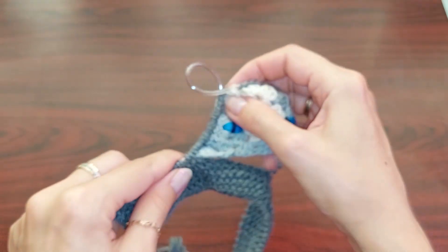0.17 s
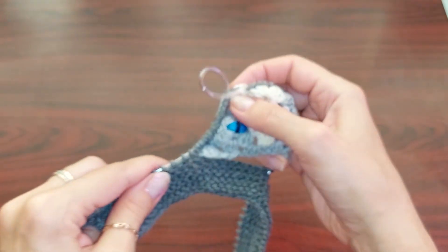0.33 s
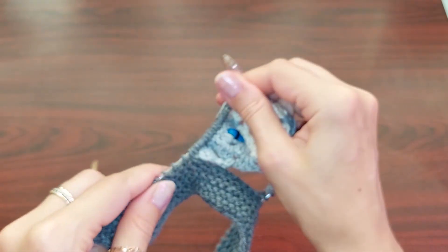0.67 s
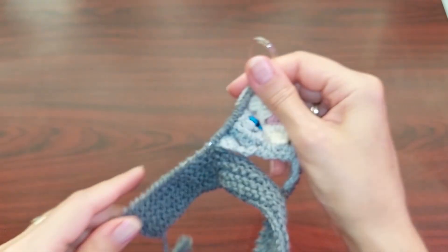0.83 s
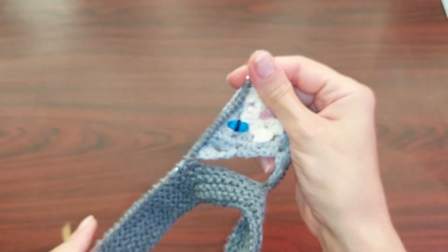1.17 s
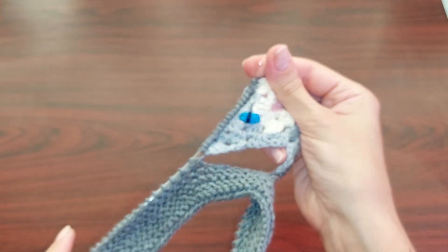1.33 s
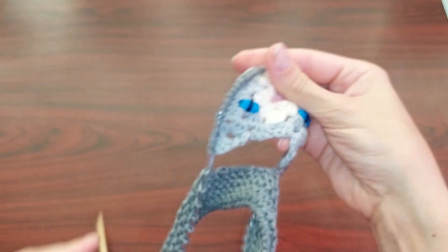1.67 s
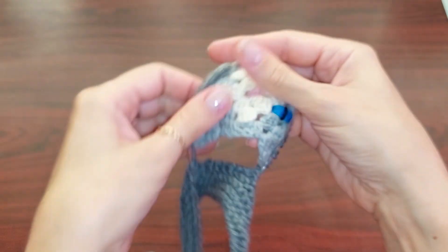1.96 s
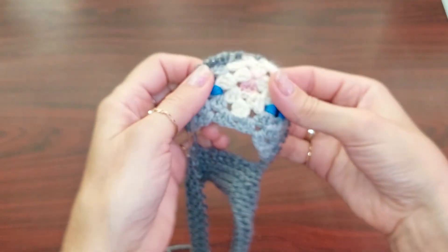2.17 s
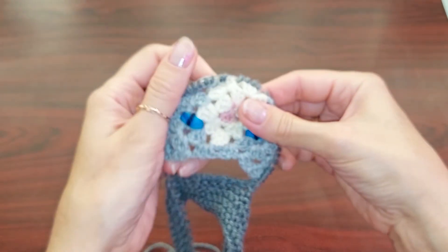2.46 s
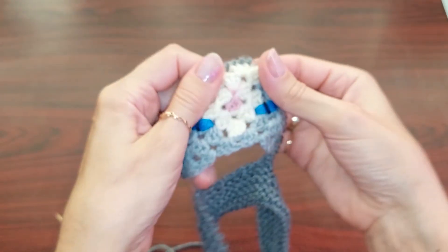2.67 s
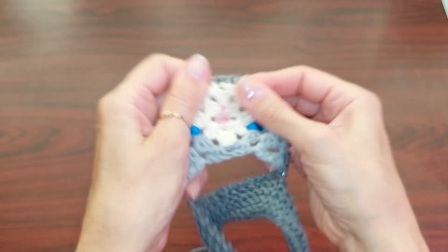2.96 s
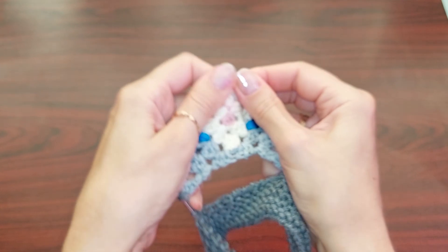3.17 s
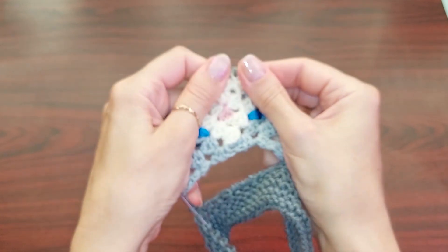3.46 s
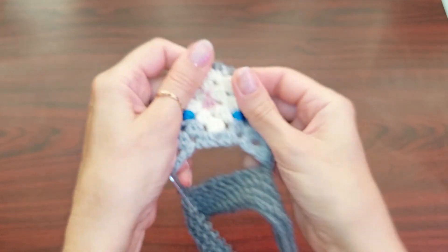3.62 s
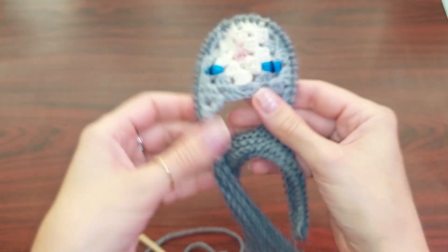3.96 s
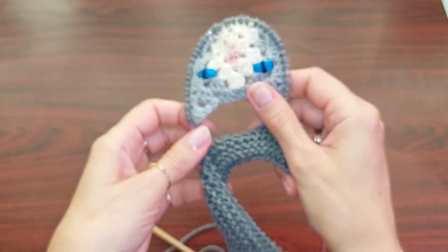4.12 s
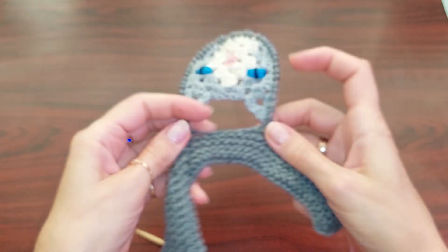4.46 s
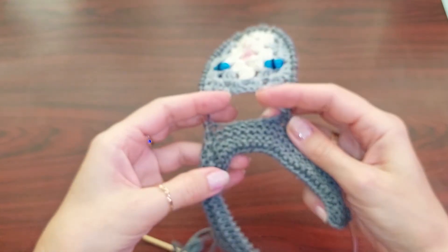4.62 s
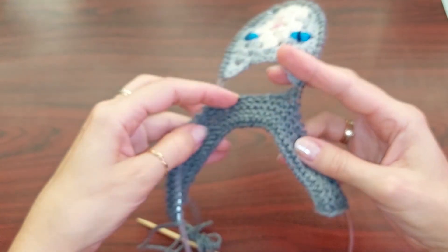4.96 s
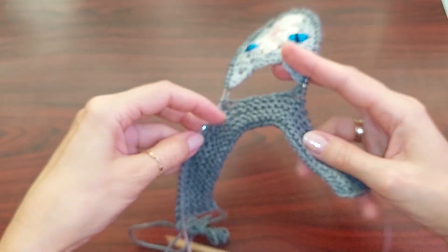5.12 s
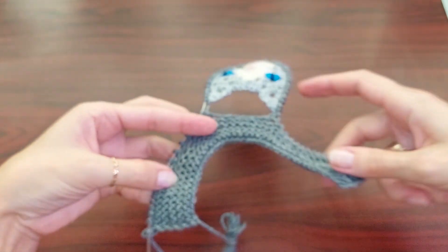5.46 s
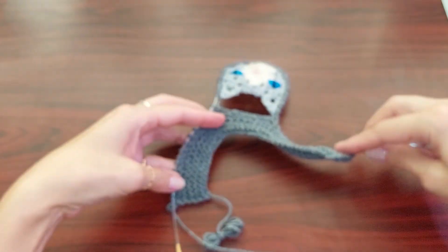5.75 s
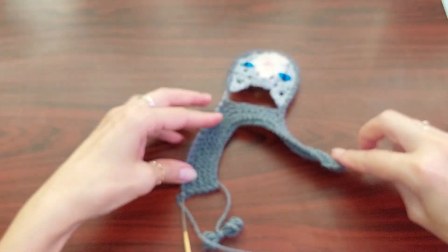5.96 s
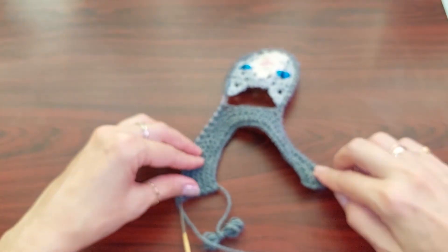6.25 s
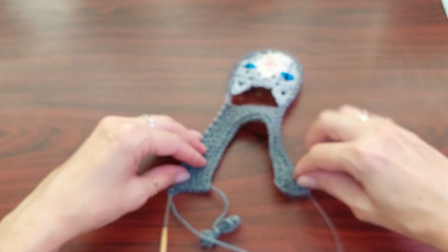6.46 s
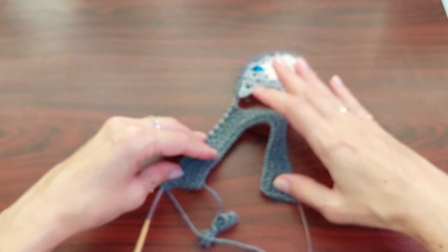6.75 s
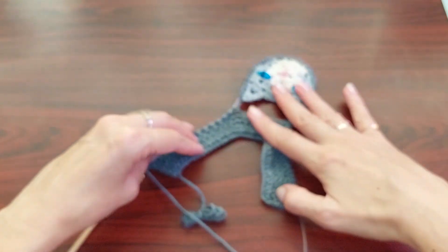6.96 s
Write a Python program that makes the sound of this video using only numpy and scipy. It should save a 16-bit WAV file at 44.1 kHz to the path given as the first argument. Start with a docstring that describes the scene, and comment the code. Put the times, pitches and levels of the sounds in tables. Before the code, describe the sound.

Knitting needles click and tick irregularly as hands shift soft rustling wool, with one brief cable creak, in a small room.

```python
"""In a small, live room, hands shift a piece of knitting on a circular needle over a wooden table.
Needles and fingers click and tick on impact. Stick-slip friction makes the cable creak through tight
stitches, stretched yarn stutter and dragging fingers sing. Wool rustles as its fibres catch and let go,
and one bump of a hand excites the table's low modes. Ventilation murmurs underneath."""
import sys
import numpy as np
from scipy import signal
from scipy.fft import rfft, irfft
from scipy.io import wavfile

SR = 44100
rng = np.random.default_rng(int(sys.argv[2]) if len(sys.argv) > 2 else 0)


def pcm_store(signal):
    """Save signal as 16-bit PCM."""
    levels = np.round(np.clip(np.atleast_2d(signal), -1, 1) * 32767)
    wavfile.write(sys.argv[1], SR, levels.astype(np.int16).T)


N = 312565
TAPS = 4096
BINS = np.fft.rfftfreq(TAPS, 1 / SR)


# The spectrum common to all clicks. Each row: frequency in Hz, gain in dB.
CLICK_SPECTRUM = [(40, -32), (130, -4), (210, -4), (310, 1.5), (550, -0.5), (750, -4), (1200, -4),
                  (2000, 2.5), (3100, 6), (5000, 6.5), (10000, 6.5), (12000, 9.5), (14500, 5),
                  (16000, -3.5)]
# A hollow colour, as from between cupped hands. Each row: frequency in Hz, gain in dB.
CUPPED_HANDS = [(620, 1), (860, -5), (1350, 5), (1700, 5), (2300, -6), (3200, 1), (4100, -4), (5200, 0.5),
                (6600, -3), (8200, 2), (9500, -1)]
# The needle's modes. Each row: frequency in Hz, level in dB, 60 dB decay time in seconds.
NEEDLE_MODES = [(2035, 3.5, 0.013), (4680, 8.5, 0.0079), (5100, -9.5, 0.0042)]
# A low resonance that moves with the grip. Each row: time in seconds, frequency in Hz.
GRIP_RESONANCE = [(0.21, 257), (0.37, 280), (0.43, 540), (0.6, 253), (0.82, 288), (2.9, 574), (3.2, 427),
                  (3.8, 584), (4.3, 518), (4.6, 335), (5.6, 315), (7, 476)]
# Where the hands work. Each row: time in seconds, left over right in dB.
HAND_PAN = [(0.5, 5.5), (2.5, 1.5), (3.7, 2.5), (5.5, -2), (7.0, 1)]
# Impacts of needles and fingers. Each row: start in seconds, level in dB, bass and treble against the
# mids in dB, ring frequency in Hz, ring height in dB, direct sound gain in dB, needle knock in dB.
IMPACTS = [(0.029, -24.5, -5, -14, 2940, 8.5, -7, -11), (0.2143, -14, 3.5, -3.5, 8850, 3.5, -8.5, -20),
           (0.369, -14.5, -6.5, 1, 6730, 1.5, -5, -15), (0.4323, -12, -2.5, -6.5, 8160, 3, -5.5, -9.5),
           (0.604, -1.5, -1, 5, 3600, 3, -6, -10.5), (0.8164, -23.5, 7, -3.5, 1330, 13.5, -6.5, -19),
           (1.0256, -22.5, 6, -0.5, 1520, 12, -7.5, -21), (1.548, -23.5, -8.5, -6, 4230, -4, -18, -20),
           (2.129, -29, -5, -8, 8200, 5, -0.5, -23), (2.1903, -23.5, -11, -3, 8100, 2, -6, -27),
           (2.3022, -13, -3.5, 4, 9400, 4, -5, -15), (2.481, -21, -4, -9.5, 7700, 2.5, -5, -22),
           (2.619, -27, -6.5, -13.5, 3340, 0, -15, -20), (2.841, -8.5, -15, -7, 10300, 6.5, -4.5, -10.5),
           (2.923, -15.5, -10, -10.5, 3030, 5, -5, -11), (3.195, -6, 5.5, 9.5, 6350, 10.5, -6.5, -7),
           (3.224, -8, -11.5, -11.5, 6500, 11.5, -9, -5), (3.4022, -20, -41, -5, 4600, 9, -7.5, -17),
           (3.5344, -15, -50, -0.5, 5200, 7.5, -4.5, -5.5), (3.7435, -28.5, 0, -6.5, 8400, 0, -14, -23),
           (3.782, -16.5, 2.5, -6, 1650, 1, -5.5, -10), (4.0228, -17.5, -5.5, -7, 1300, 1, -9, -15),
           (4.165, -25.5, 2, -8.5, 8450, 2.5, -5, -26.5), (4.2791, -28.5, 6, -5, 5400, -3, -4.5, -23),
           (4.3832, -21, -11.5, 3, 6500, 4.5, -6, -25), (4.588, -0.5, -12, -4.5, 4400, 3, -6, -3.5),
           (4.6747, -11.5, -3, -8.5, 1280, 4, -6.5, -21), (4.7449, -17, -14, -6, 1310, 6.5, -12, -25),
           (5.0469, -2.5, -11, -2.5, 8500, 5.5, -7, -8), (5.581, 4.5, -10.5, -2.5, 2260, 7.5, -2.5, 1),
           (6.1846, -16.5, -16.5, -27.5, 1020, 8, -15.5, -10), (6.725, -21, -32, -6.5, 4910, 5.5, -7, -10),
           (7.0257, -9, -7, -2, 8350, 3.5, -4.5, -6)]


def clicks(chatter_s=0.0022, chatter_doubling_db=31, grip_db=7, room_db=-0.54):
    """Impacts ring resonances; louder clicks have shorter chatter."""
    out = np.zeros((2, N))
    needle = abs(rfft(unit(ring(NEEDLE_MODES))[:TAPS]))
    for start, db, bass, treble, ring_hz, ring_db, direct_db, knock_db in IMPACTS:
        tilt = read([(550, bass), (1100, 0.005), (2100, 0.005), (4200, 0.74 * treble - 1),
                     (6500, treble), (11000, 1.43 * treble - 0.5)], BINS)
        tilt += read([(12500, 0), (15500, min(db, 0) / 2)], BINS)  # the top treble falls away on quieter clicks
        grip_hz = np.interp(start, *np.transpose(GRIP_RESONANCE))
        peaks = ring_db * hump(ring_hz, width=0.12) + grip_db * hump(grip_hz, width=0.17)
        hollow = np.clip((bass + 13) / 10, 0, 1.2) * read(CUPPED_HANDS, BINS)  # deep taps sound hollow
        body = amp(read(CLICK_SPECTRUM, BINS) + peaks + hollow + ripple(db=3.5, per_octave=11))
        colour = minimum_phase(tilt + 20 * np.log10(np.hypot(body, amp(knock_db) * needle)))
        crack = contact(chatter_s * 2 ** (-db / chatter_doubling_db))
        pan_db = np.interp(start, *np.transpose(HAND_PAN))
        add(out, start, amp(db + direct_db) * pan(pan_db) * unit(convolve(crack, colour)))
        add(out, start, amp(db + room_db) * unit(convolve(room_tail(), colour)))
    return out


# Thin, dry ticks. Each row: start in seconds, energy in dB, centre frequency in Hz.
LIGHT_CONTACTS = [(1.1414, -24.5, 5060), (1.767, -17, 10000), (1.951, -35.5, 10400), (2.8227, -16, 5400),
                  (5.8187, -33.5, 6400), (6.566, -38.5, 6940)]


def ticks(chatter_s=0.0012, slope_db_per_octave=13, pan_db=4, room_db=-8):
    """A brief contact has a broad spectrum, here with a single hump in the treble."""
    out = np.zeros((2, N))
    for start, db, hz in LIGHT_CONTACTS:
        octaves_away = abs(np.log2((BINS + 1) / hz))
        colour = minimum_phase(-slope_db_per_octave * np.minimum(octaves_away, 3))
        add(out, start, amp(db) * pan(pan_db) * unit(convolve(contact(chatter_s), colour)))
        add(out, start, amp(db + room_db) * unit(convolve(room_tail(), colour)))
    return out


# What a slip rings. Each row: frequency in Hz, gain in dB under a light grip, then under a tight one.
CABLE_SPECTRA = [(606, -9.5, -13), (1150, -8, -11), (1400, -31, -11), (1745, -6, -4), (2050, -3, 4.5),
                 (2660, -2.5, 1.5), (3000, -12, -2.5), (4100, -6.5, -8), (4400, 3.5, -5),
                 (4670, -10.5, -7.5), (6120, 1, -12), (6870, -9.5, -19), (8000, -4, -14.5),
                 (9900, -9.5, -23), (14000, -13, -21.5), (16000, -29, -30)]
# The cable runs, catches, then breaks free. Each row: time in seconds, slips per second,
# slip level in dB, low cutoff in Hz, grip from 0 to 1.
CABLE_PULL = [(1.181, 240, -22.5, 1700, 0.24), (1.22, 360, -20.5, 1560, 0.15), (1.303, 340, -18, 1480, 0.2),
              (1.316, 150, -16, 890, 0.52), (1.397, 140, -11, 690, 0.65), (1.423, 360, -13, 540, 0.88),
              (1.435, 320, -12.5, 537, 0.3)]


def cable_creak(delay_s=0.0006, delay_at_hz=1150, grit_hz=6000, direct_db=-0.7, room_db=-6.5):
    """Stick-slip in the stitches launches bending waves; dispersion turns each slip into a chirp."""
    times, *controls = np.transpose(CABLE_PULL)
    t = np.arange(times[0], times[-1], 1 / SR)
    rate, db, cutoff_hz, grip = (np.interp(t, times, control) for control in controls)
    train = slips(rate, jitter=0.14, spread_db=1) * amp(db)
    light, tight = (read(np.array(CABLE_SPECTRA)[:, [0, k]], BINS) for k in (1, 2))
    grit_share = 0.45 / (1 + (grit_hz / (BINS + 1)) ** 4)
    chirp = np.exp(-4j * np.pi * delay_s * np.sqrt(BINS * delay_at_hz))  # low waves travel slowest
    dry = np.zeros((2, N))
    for i in np.flatnonzero(train):
        low_cut = np.maximum(-10 * np.log10(1 + (cutoff_hz[i] / (BINS + 1)) ** 8), -50)
        colour_db = light + grip[i] * (tight - light) + low_cut + ripple(db=1.6, per_octave=5)
        colour = rfft(minimum_phase(colour_db), TAPS)
        grit = rfft(contact(chatter_s=0.0011), TAPS)
        push = np.sqrt(1 - grit_share) * chirp + np.sqrt(grit_share) * grit
        add(dry, t[i], train[i] * unit(irfft(colour * push)[:, :TAPS // 2]))
    reverb = convolve(dry, room_tail(early_db=15, early_s=0.017))[:, :N]
    return amp(direct_db) * pan(db=2) * dry + amp(room_db) * reverb


# The resonances of the rasp. Each row: frequency in Hz, bandwidth in Hz, weight in dB.
YARN_MODES = [(1400, 210, -19), (1600, 240, -1), (2680, 480, -12), (5100, 1900, -37), (7800, 1800, -41)]
# Each row: start and length in seconds, level in dB, share of hollow ring in dB, slips per second.
YARN_PULLS = [(0.033, 0.14, -64.5, -20, 83), (2.66, 0.076, -65, -4.5, 360), (2.73, 0.085, -57.5, -4.5, 350),
              (3.817, 0.14, -56.5, -2, 320)]


def yarn_stutter(glide_hz=(600, 525), width_hz=115, scrape_s=0.002, fade_s=0.005, room_db=-5):
    """Stretched yarn yields by stick-slip, driving a rasp and a hollow resonance that sinks with it."""
    out = np.zeros((2, N))
    modes = [(hz, db + 10 * np.log10(width), decay_time(width)) for hz, width, db in YARN_MODES]
    rasp_response = np.gradient(ring(modes))
    for start, length, db, hollow_db, rate in YARN_PULLS:
        t = np.arange(0, length, 1 / SR)
        jerks = slips(np.full(len(t), rate), jitter=0.3, spread_db=0.5)
        scrape = convolve(jerks, np.exp(-t / scrape_s))[:, :len(t)] * rng.standard_normal(len(t))
        hz = np.linspace(*glide_hz, len(t))
        hollow = unit(resonate(resonate(scrape, hz, width_hz), hz, width_hz))
        rasp = unit(convolve(scrape, rasp_response)[:, :len(t)])
        share = min(amp(hollow_db), 0.95)
        envelope = swell(t, length, peak=0.6, ends_db=-5.5) * np.minimum((length - t) / fade_s, 1)
        dry = amp(db) * np.sqrt(len(t)) * envelope * (share * hollow + np.sqrt(1 - share ** 2) * rasp)
        add(out, start, dry)
        add(out, start, amp(room_db) * convolve(dry, room_tail()))
    return out


# Each row: start and length in seconds, level in dB, resonance frequency and bandwidth in Hz.
FINGER_DRAGS = [(0.0, 0.13, -64, 1970, 720), (5.24, 0.14, -67, 1440, 500), (5.738, 0.033, -53, 3470, 700),
                (5.925, 0.053, -66.5, 1244, 505), (6.347, 0.022, -51, 5070, 810),
                (6.36, 0.09, -60.5, 1950, 400), (6.915, 0.025, -52.5, 1470, 700)]


def finger_rubs(slips_per_s=400):
    """Uneven stick-slip of skin on needle or table drives one heavily damped resonance."""
    out = np.zeros((2, N))
    for start, length, db, hz, width in FINGER_DRAGS:
        t = np.arange(0, length, 1 / SR)
        friction = slips(np.full(len(t), slips_per_s), jitter=0.5, spread_db=3)
        friction *= swell(t, length, peak=0.5, ends_db=-3)
        body = ring([(hz, 0, decay_time(width))])
        voice = amp(db) * np.sqrt(len(t)) * unit(convolve(convolve(friction, body), np.gradient(body)))
        add(out, start, convolve(voice, room_tail(early_db=20, early_s=0.012)))
    return out


# The spectrum of rubbing fibres. Each row: frequency in Hz, gain in dB.
WOOL_SPECTRUM = [(180, -11.5), (330, 1), (480, -4.5), (750, -21), (1000, 4.5), (1800, 5), (2600, 3.5),
                 (4000, -10), (5200, -6.5), (12500, -13.5), (15500, -34.5)]
# Wool slides on skin and wood. Each row: start and length in seconds, place of the peak from 0 to 1,
# level in dB, low and high bands against the mids in dB.
WOOL_STROKES = [(0.287, 0.041, 0.1, -62, -28, 6), (1.036, 0.22, 0, -60.5, -8, 0),
                (1.714, 0.092, 0.9, -60.5, -10, 2), (1.905, 0.23, 0.8, -67.5, -10, 4),
                (2.29, 0.13, 0.4, -58, -40, 8), (3.028, 0.1, 1, -82, -26, 15),
                (3.657, 0.087, 0.3, -81.5, -23, 10), (3.851, 0.17, 0, -61.5, -7, 2.5),
                (4.425, 0.083, 0.66, -73.5, -22, 11), (5.151, 0.51, 0, -61.5, -21, 0),
                (5.712, 0.076, 0.52, -55.5, -8, 2), (5.788, 0.19, 0.88, -67.5, 1, -3),
                (6.34, 0.063, 0.17, -71, -28, 19), (6.385, 0.059, 0.87, -67.5, -24, 13),
                (6.79, 0.17, 0.38, -51.5, -16, 1), (6.873, 0.37, 0.36, -55.5, 0.5, -7)]


def wool_rustle(catches_per_s=1500, stitches_per_s=70, fade_s=0.0084, direct_db=-4, room_db=-2):
    """Friction noise: many fibres catch and let go at random, in clumps as the stitches pass."""
    out, t = np.zeros((2, N)), np.arange(N) / SR
    catches = (rng.random((2, N)) < catches_per_s / SR) * rng.standard_normal((2, N))
    catches *= amp(2 * np.minimum(rng.exponential(1, (2, N)), 3))
    grain = tinted(unit(catches) + 0.8 * unit(diffuse(N)), WOOL_SPECTRUM)
    mid = [(550, -37.5), (850, -6.5), (3200, -4), (5000, -19)]  # Hz, dB
    low = [(120, -16.5), (270, -11), (750, 11), (1200, -44)]
    high = [(2200, -24), (3800, 2)]
    envelopes = np.zeros((3, N))
    for start, length, peak, db, low_db, high_db in WOOL_STROKES:
        age = np.arange(-fade_s / 2, length + fade_s / 2, 1 / SR)
        touch = np.clip(np.minimum(age, length - age) / fade_s + 0.5, 0, 1)
        stroke = amp(db) * touch * swell(age, length, peak, ends_db=-11.5)
        add(envelopes, start - fade_s / 2, amp([[0], [low_db], [high_db]]) * stroke)
    for band, envelope in zip((mid, low, high), envelopes):
        clumps = amp(0.5 * wander(t * stitches_per_s))
        out += envelope * clumps * unit(tinted(grain, band)) * np.sqrt(N)
    return amp(direct_db) * out + amp(room_db) * convolve(out, room_tail(early_db=30.5))[:, :N]


# The table top's modes. Each row: frequency in Hz, level in dB, 60 dB decay time in seconds.
TABLE_MODES = [(90, -16.5, 0.12), (142, -6.5, 0.11), (242, -3, 0.052), (398, -3.5, 0.046),
               (492, -16.5, 0.2)]
# A hand meets the table. Each row: start in seconds, level in dB.
HAND_BUMPS = [(5.633, -30.5)]


def table_bump(rise_s=0.0026, room_db=-11):
    """A soft impact sets the table's low modes in free vibration, which takes a moment to swell."""
    out, thud = np.zeros((2, N)), ring(TABLE_MODES)
    thud *= 1 - np.exp(-np.arange(len(thud)) / SR / rise_s)
    for start, db in HAND_BUMPS:
        add(out, start, amp(db) * thud)
        add(out, start, amp(db + room_db) * convolve(thud, room_tail()))
    return out


# Each row: frequency in Hz, the room's 60 dB decay time in seconds.
REVERB_TIMES = [(150, 0.56), (500, 0.45), (2000, 0.36), (5000, 0.31), (9000, 0.29), (15000, 0.18)]


def room_tail(onset_s=0.0046, early_db=4, early_s=0.0041):
    """Reverberation: strong early reflections, then exponential decay at each band's own rate."""
    hz, t, bands = signal.stft(diffuse(SR * 2 // 3), SR, nperseg=256)
    decay = amp(-60 * t / read(REVERB_TIMES, hz)[:, None])
    tail = signal.istft(bands * decay, SR, nperseg=256)[1]
    t = np.arange(tail.shape[1]) / SR
    return unit(tail * (1 - np.exp(-(t / onset_s) ** 2)) * amp(early_db * np.exp(-t / early_s)))


# Each row: frequency in Hz, relative level of the background in dB.
VENTILATION_SPECTRUM = [(20, -30.5), (50, -5.5), (135, -1), (190, -8), (310, -10.5), (550, -19.5),
                        (900, -23), (2000, -28.5), (13000, -27.5), (15000, -53)]


def ventilation(level_db=-73):
    """Steady diffuse noise: a low murmur with faint hiss."""
    return amp(level_db) * np.sqrt(N) * unit(tinted(diffuse(N), VENTILATION_SPECTRUM))


# Each row: frequency in Hz, left-right coherence from 0 to 1.
COHERENCE = [(25, 0.39), (70, 0.55), (140, 0.088), (300, 0.65), (600, 0.67), (1200, 0.056), (4000, 0)]


def diffuse(size):
    """A diffuse field is partly coherent at two microphones only at long wavelengths."""
    a, b = rfft(rng.standard_normal((2, size)))
    shared = read(COHERENCE, np.fft.rfftfreq(size, 1 / SR))
    return irfft([a, shared * a + np.sqrt(1 - shared ** 2) * b], size)


def contact(chatter_s, rise_s=0.00025):
    """Touching surfaces chatter: a decaying broadband burst, partly alike at both microphones."""
    t = np.arange(SR // 40) / SR
    noise = rng.standard_normal((3, len(t)))
    spectrum = rfft((noise[:2] + noise[2]) * (1 - np.exp(-t / rise_s)) * np.exp(-t / chatter_s))
    whitened = irfft(spectrum / (abs(spectrum) + 1e-9), len(t))
    window = np.minimum(1, 2 - 2 * t / t[-1]) ** 2 * (t < t[-1] * 3 / 4)
    return unit(whitened * window)


def slips(rate, jitter, spread_db):
    """Relaxation oscillation: one impulse each time the load builds up, uneven in time and size."""
    load = np.cumsum(rate) / SR
    gaps = np.exp(jitter * rng.standard_normal(int(load[-1]) * 2 + 2))
    thresholds = np.r_[0, np.cumsum(gaps)]
    at = np.searchsorted(load, thresholds[thresholds < load[-1]])
    train = np.zeros(len(rate))
    train[at] = amp(spread_db * rng.standard_normal(len(at)))
    return train


def ring(modes):
    """Free vibration as a sum of damped sines."""
    t = np.arange(SR // 2) / SR
    return sum(amp(db - 60 * t / t60) * np.sin(2 * np.pi * hz * t) for hz, db, t60 in modes)


def decay_time(width_hz):
    """A mode's 60 dB decay time is inverse to its bandwidth."""
    return np.log(1000) / np.pi / width_hz


def resonate(x, hz, width_hz):
    """Forced vibration of a resonance that follows the curve hz."""
    phasor = np.exp(2j * np.pi * np.cumsum(hz) / SR)
    pole = np.exp(-np.pi * width_hz / SR)
    return (phasor * signal.lfilter([1 - pole], [1, -pole], x / phasor)).real


def swell(t, length, peak, ends_db):
    """The gain of a hand movement: an arch in decibels."""
    away = np.interp(t, [0, np.clip(peak, 0.02, 0.98) * length, length], [1, 0, 1])
    return amp(ends_db * away ** 2)


def hump(hz, width):
    """A resonance peak, bell-shaped in log frequency."""
    return np.exp(-(np.log((BINS + 1) / hz) / width) ** 2)


def wander(position):
    """A random curve with a new value at each whole position."""
    return np.interp(position, np.arange(TAPS), rng.standard_normal(TAPS))


def ripple(db, per_octave):
    """Random peaks and dips in dB: no two grips ring alike."""
    return db * wander(np.log2(BINS + 1) * per_octave)


def minimum_phase(db):
    """The shortest causal response with this spectrum."""
    log_gain = np.log(amp(np.r_[db, db[-2:0:-1]]))
    return np.fft.ifft(np.exp(np.conj(signal.hilbert(log_gain)))).real[:TAPS // 2]


def tinted(x, points):
    """Filters a sound by a spectrum in dB."""
    size = x.shape[-1]
    return irfft(rfft(x) * amp(read(points, np.fft.rfftfreq(size, 1 / SR))), size)


def read(points, hz):
    """Interpolates in log frequency."""
    f, value = np.transpose(points)
    return np.interp(np.log(hz + 1), np.log(f), value)


def amp(db):
    """Decibels to gain."""
    return 10 ** (np.asarray(db) / 20)


def unit(x):
    """Scales to a mean energy of one per channel."""
    return x / np.sqrt(np.mean(np.sum(x ** 2, -1)) + 1e-30)


def pan(db):
    """Left and right gains from a level difference."""
    return amp(np.array([[db], [-db]]) / 2)


def add(mix, start, sound):
    """Mixes a sound in at start seconds."""
    part = mix[:, max(round(start * SR), 0):][:, :sound.shape[-1]]
    part += sound[..., :part.shape[1]]


def convolve(a, b):
    """Convolves along time, channel by channel."""
    return signal.fftconvolve(np.atleast_2d(a), np.atleast_2d(b), axes=1)


def scene():
    """Superposition of all sources at the two microphones."""
    knitting = clicks() + ticks() + cable_creak() + yarn_stutter() + finger_rubs() + wool_rustle()
    return knitting + table_bump() + ventilation()


# The microphones' housing notches the treble. Each row: frequency in Hz, gain in dB.
HOUSING_RESPONSE = [(1780, -1), (1940, -2), (2100, -3.5), (3700, -2.5), (4130, -4), (4500, -2.5),
                    (7700, -1.5), (8300, 0), (9300, -4), (11000, -1)]


def record(dry, cutoff_hz=16200):
    """Linear filtering by the microphones' housing, then the recorder's band limit."""
    low_pass = signal.firwin(255, cutoff_hz, window=("kaiser", 8), fs=SR)
    return signal.oaconvolve(tinted(dry, HOUSING_RESPONSE), low_pass[None], "same")


dry = scene()
out = record(dry)
pcm_store(out)
```